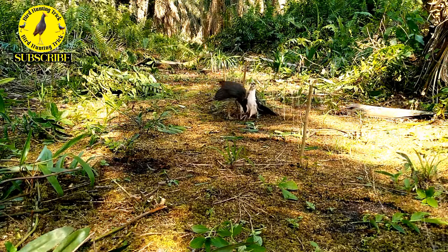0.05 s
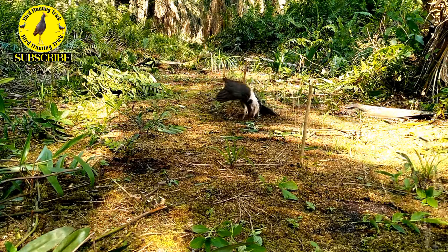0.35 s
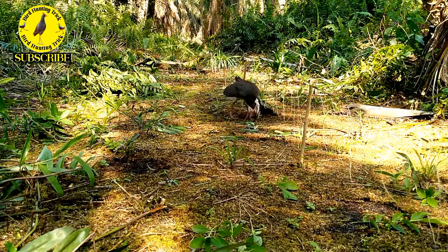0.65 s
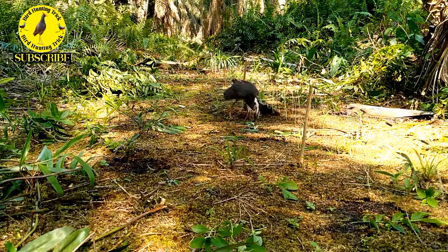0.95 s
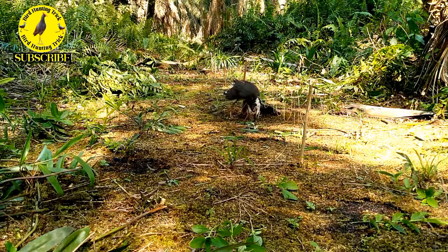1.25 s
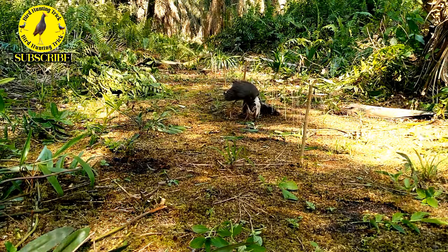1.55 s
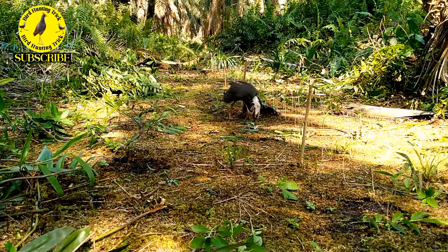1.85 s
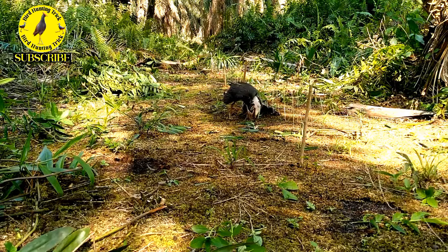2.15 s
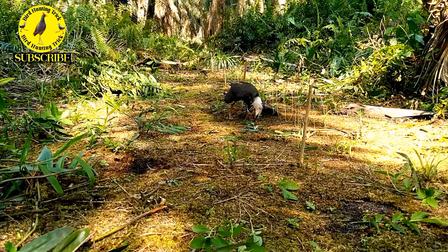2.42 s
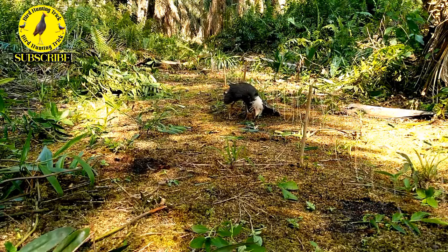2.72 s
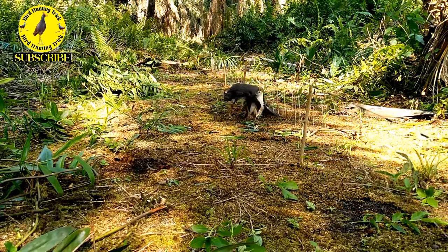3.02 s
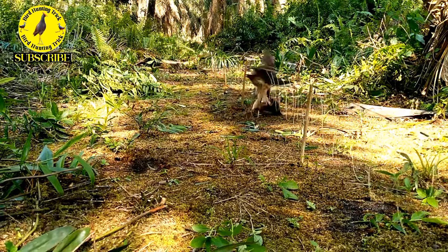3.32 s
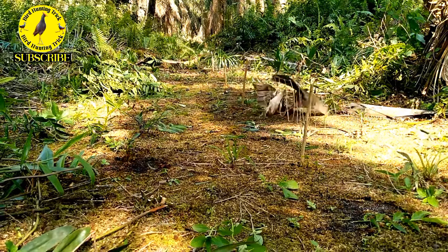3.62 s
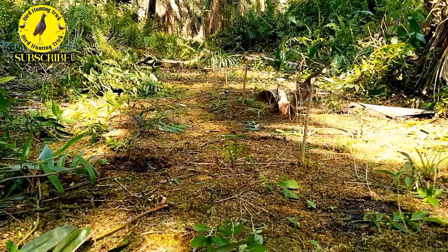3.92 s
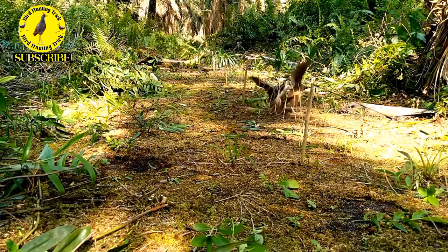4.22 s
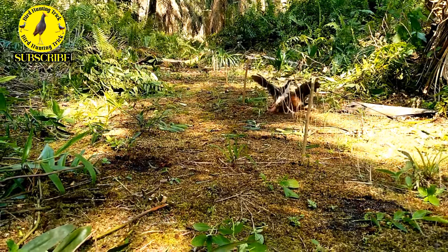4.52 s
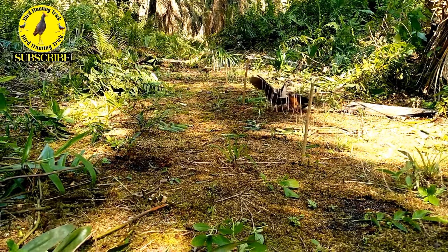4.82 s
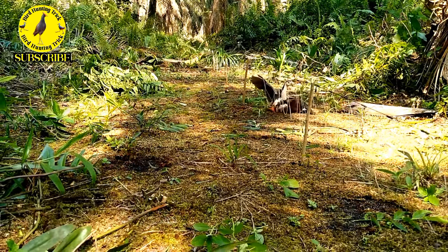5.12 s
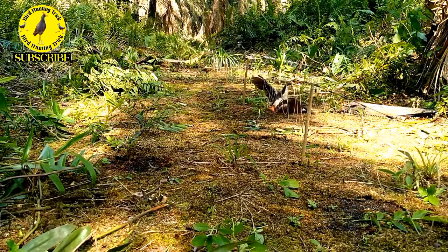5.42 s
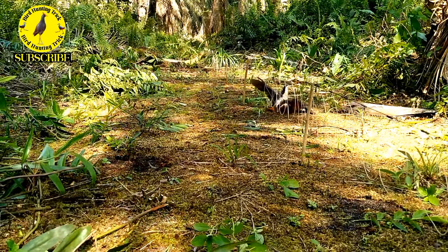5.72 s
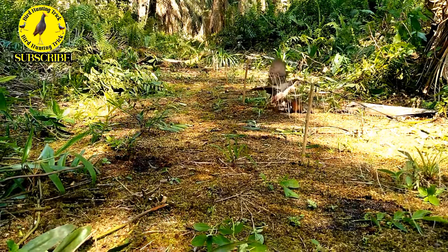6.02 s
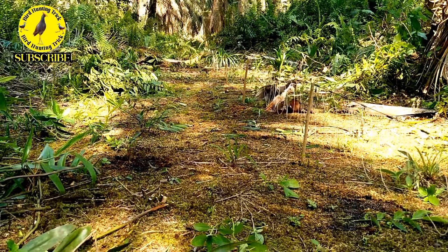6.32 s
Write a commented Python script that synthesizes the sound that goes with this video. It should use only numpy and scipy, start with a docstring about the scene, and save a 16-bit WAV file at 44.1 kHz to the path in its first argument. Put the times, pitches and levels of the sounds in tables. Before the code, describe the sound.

In a still, wooded marsh, insects hold a high drone while a bird fairly near the microphone calls in an even beat of short, raspy, rising notes. Another bird gives quieter, hoarse answers from deeper among the trees. Faint clucking and scratchy chatter grow rougher midway and fade as the main calls carry on. Occasional distant whistles and dull, soft bumps sit underneath, and the calls have a brief echo.

```python
"""A watercock repeats one short note, 2.5 times a second, in a wooded marsh: its syrinx starts low
and raspy, then breaks upward into a reedy tone that the windpipe colours. A second bird answers
farther off; faint rough clucks and scratchy chatter build up and die away. Insects drone high
above still air, with thin distant whistles and soft low thumps. The trees return a short echo."""
import sys
import numpy as np
from scipy import signal
from scipy.fft import rfft, irfft
from scipy.io import wavfile
from scipy.ndimage import uniform_filter1d

SR = 44100
rng = np.random.default_rng(int(sys.argv[2]) if len(sys.argv) > 2 else 0)


def digitize_waveform(pressure):
    """Quantize a signal to 16-bit integers and store it at the path in sys.argv[1].

    Rows of a 2-D input are taken as channels; values are limited to [-1, 1].
    """
    field = np.atleast_2d(pressure).T
    bounded = np.clip(field, -1, 1)
    quanta = np.round(bounded * 32767).astype(np.int16)
    wavfile.write(sys.argv[1], SR, quanta)


N = 280035
TIME_S = np.arange(N) / SR

# noise spectra: f/Hz, relative level/dB
AIR_SPECTRUM = [(20, -30), (45, -7), (75, 4.5), (140, -1), (220, -13), (450, -17.5), (800, -17.5),
                (1500, -22.5), (4000, -26), (4700, -29.5), (5100, -28.5), (7000, -32), (12000, -32),
                (15000, -41)]
INSECT_SPECTRUM = [(6500, -50), (7050, -28), (7550, -8), (7900, -9.5), (8350, -13.5), (8800, -6), (9150, 1),
                   (9500, -3.5), (10000, -15), (10400, -27), (10900, -26.5), (11700, -48), (13000, -66.5)]
CHATTER_SPECTRUM = [(400, -18.5), (1200, 2), (1700, -8.5), (2200, -4.5), (2550, 4.5), (2850, -6),
                    (3200, 3.5), (4100, -8.5), (4800, -5.5), (5600, -20.5), (7500, -27.5)]
CLUCK_SPECTRUM = [(200, -9), (420, 13.5), (800, -3), (1400, 3), (2400, -1.5), (3500, -18.5), (5200, -23.5),
                  (7000, -43.5)]
# far cricket trills: f/Hz, width/Hz, level/dB
CRICKET_BANDS = [(4726, 680, -83.5), (4600, 330, -82.5)]
# far bird's calls: t/s, level/dB
ANSWERS = [(-.088, -37.5), (.512, -36.5), (1.064, -40), (1.645, -36), (2.2, -36), (2.808, -37.5),
           (3.414, -38), (3.999, -38), (4.611, -37), (5.347, -39), (6.1, -35.5)]
# their reedy overtones: multiple, level/dB
ANSWER_OVERTONES = [(2, -35), (3, -35.5), (4, -26), (5, -32)]
# chatter bouts: full at t/s, hold/s, level/dB, build-up/(dB/s)
CHATTER_BOUTS = [(.1, 0.07, -65, 37), (1.669, .06, -66.5, 70), (2.9, 1.4, -61, 7.5)]
# near bird's runs, each restarting just ahead of the beat: t/s
RUN_STARTS_S = [.139, 2.5081, 6.0663]
# near bird's overtones: multiple, level/dB
EVEN_OVERTONES = [(2, -24.5), (4, -46.5), (6, -47.5), (8, -42.5)]  # throughout
LOW_OVERTONES = [(1.5, -26), (2, -37.5), (2.5, -27), (3, -39), (7, -47), (7.5, -42)]  # period-doubled opening
REED_OVERTONES = [(3, -13.5), (5, -41), (7, -33), (9, -31)]  # after the break
# windpipe response on the overtones: f/Hz, gain/dB
WINDPIPE_GAIN = [(1600, 2), (1880, -7), (2130, -7.5), (2280, -2), (2950, 0), (3450, 0), (3900, 11),
                 (4250, -3.5), (4750, -4), (5100, 9), (5400, 1), (5750, 3.5), (6500, -7.5), (7500, 2.5),
                 (8600, -3.5), (10000, 3)]
# broad low hiss under each note (first row), then bands of rasp: f/Hz, width/Hz, level/dB
NOTE_NOISE_BANDS = [(567, 800, -55), (1079, 190, -43), (1420, 670, -55.5), (2240, 160, -67.5),
                    (5700, 200, -64.5)]
# distant birds: t/s, length/s, start f/Hz, end f/Hz, level/dB
WHISTLES = [(0.338, 0.16, 2660, 2410, -63.5), (0.351, 0.089, 1263, 1450, -59.5),
            (2.39, 0.1, 2500, 2530, -66), (2.449, 0.088, 1286, 1400, -60), (3.84, 0.095, 2430, 2590, -57.5),
            (4.805, 0.062, 2025, 1930, -64.5)]
# low thumps: t/s, level/dB, f/Hz
THUMPS = [(0.394, -47, 70.5), (0.74, -48, 86), (0.966, -44, 68), (3.588, -44.5, 68.7), (3.9, -49, 79.4),
          (3.966, -39.5, 63.5), (4.31, -46, 60)]
# rising clucks: t/s, level/dB
CLUCKS = [(1.193, -58.5), (1.468, -59), (1.61, -55.5), (1.841, -54.5), (1.985, -58.5), (2.394, -55.5),
          (2.653, -61.5), (2.738, -56.5), (3.088, -56), (3.2, -58), (3.445, -50), (3.562, -49.5),
          (3.66, -54.5), (3.794, -53.5), (3.861, -55), (4.002, -50.5), (4.236, -52.5), (4.377, -50.5)]
# nearest trunks: delay/s, gain/dB
TRUNK_ECHOES = [(0.02, -25), (0.031, -35), (.0475, -30)]
# scatter from the wood: f/Hz, gain/dB
TAIL_GAIN = [(500, -28), (800, -46), (1150, -38), (2200, -22.5), (2900, -21), (3350, -16.5), (4200, -15),
             (5200, -14), (5720, -8), (6200, -15), (9000, -18.5)]
# its decay: f/Hz, T60/s
TAIL_T60 = [(500, 0.31), (1100, 0.64), (3300, 0.26), (6000, 0.41), (10000, .25)]


def amp(db):
    """Decibels to gain."""
    return 10 ** (np.asarray(db) / 20)


def unit_rms(x):
    """Scale to rms 1."""
    return x / np.sqrt(np.mean(x ** 2) + 1e-20)


def lookup(points, hz):
    """Interpolate on a log-frequency axis."""
    f, value = np.transpose(points)
    return np.interp(np.log(hz + 1), np.log(f + 1), value)


def add(mix, at_s, sound):
    """Mix a sound in at at_s."""
    start = round(at_s * SR)
    sound = sound[max(-start, 0):]
    part = mix[max(start, 0):][:len(sound)]
    part += sound[:len(part)]


def step(t, at_s, width_s):
    """Smooth step, 0 to 1."""
    return .5 + .5 * np.tanh((t - at_s) / (2 * width_s))


def bump(t, at_s, width_s):
    """Bell of height 1."""
    return np.exp(-((t - at_s) / width_s) ** 2)


def held(t, attack_s, release_s):
    """Rounded attack, hold, release."""
    ramp = np.minimum(t / attack_s, (t[-1] - t) / release_s)
    return np.sin(np.pi / 2 * np.clip(ramp, 0, 1)) ** 2


def wander(size, hz):
    """Smooth random drift, rms about 1, rolled off above hz."""
    span = max(size, SR // 4)
    lowpass = np.exp(-(np.fft.rfftfreq(span, 1 / SR) / hz) ** 2)
    return unit_rms(irfft(rfft(rng.standard_normal(span)) * lowpass, span))[:size]


def noise(spectrum, size):
    """Shaped noise, rms about 1."""
    span = max(size, SR // 4)
    gain = amp(lookup(spectrum, np.fft.rfftfreq(span, 1 / SR)))
    return unit_rms(irfft(rfft(rng.standard_normal(span)) * gain, span))[:size]


def patchy(spectrum, depth_db, patch_hz, patch_s):
    """Noise of rms 1; its level drifts in time-frequency patches."""
    hz, t, bins = signal.stft(rng.standard_normal(N), SR, nperseg=1024, noverlap=768)
    field = uniform_filter1d(rng.standard_normal(bins.shape), max(round(patch_hz / hz[1]), 1), 0)
    field = unit_rms(uniform_filter1d(field, max(round(patch_s / t[1]), 1), 1))
    bins *= amp(lookup(spectrum, hz)[:, None] + depth_db * field)
    return unit_rms(signal.istft(bins, SR, nperseg=1024, noverlap=768)[1][:N])


def bandpass(x, hz, width_hz):
    """Two-pole band-pass applied twice, scaled to rms 1."""
    b, a = signal.iirpeak(hz, hz / width_hz, SR)
    return unit_rms(signal.lfilter(b, a, signal.lfilter(b, a, x)))


def still_air(level_db=-61):
    """Faint, bass-heavy hush of the marsh."""
    return amp(level_db) * patchy(AIR_SPECTRUM, depth_db=3.9, patch_hz=200, patch_s=.034)


def insects(drone_db=-50, throb_db=1, trill_db=3):
    """Many insects merge into one high drone; cricket trills come and go below it."""
    gain = amp(drone_db + throb_db * wander(N, 20))
    drone = gain * patchy(INSECT_SPECTRUM, depth_db=1, patch_hz=260, patch_s=.07)
    trills = sum(amp(db + trill_db * wander(N, 5)) * bandpass(rng.standard_normal(N), hz, width_hz)
                 for hz, width_hz, db in CRICKET_BANDS)
    return drone + trills


def far_bird(low_hz=598.8, top_hz=1119, catch_hz=98, flick_hz=123,
             flutter=.024, shimmer_db=3.5, hoarse_db=-12, half_pitch_db=-4.5):
    """Hoarse answers: soft start, rise to a reedy hold, brief catch, upward flick."""
    out, t = np.zeros(N), np.arange(0, .1077, 1 / SR)
    rise = step(t, .03, .006)
    doubling = bump(t, .054, .011)  # period doubles: the tone dips, a half-pitch line enters
    catch = bump(t, .071, .0036)
    hz = low_hz + (top_hz - low_hz) * rise - catch_hz * catch + flick_hz * step(t, .091, .0022)
    effort_db = -12.5 * (1 - rise) - 10 * catch - 6 * doubling
    effort = held(t, attack_s=.006, release_s=.014) * amp(effort_db)
    reedy = np.clip((hz - 1020) / 60, 0, 1) * np.clip((1200 - hz) / 50, 0, 1)
    for at_s, db in ANSWERS:
        phase = 2 * np.pi * np.cumsum(hz * (1 + flutter * wander(len(t), 110))) / SR
        tone = np.sin(phase) + amp(half_pitch_db) * doubling * np.sin(phase / 2)
        tone += reedy * sum(amp(line_db) * np.sin(k * phase) for k, line_db in ANSWER_OVERTONES)
        tone += amp(hoarse_db) * wander(len(t), 280) * np.cos(phase)
        add(out, at_s, effort * amp(db + shimmer_db * wander(len(t), 120)) * tone)
    return out


def chatter(fall_db_per_s=47, spurt_db=2.2):
    """Faint scratchy clamour: swells in bouts, comes in quick spurts."""
    power = np.zeros(N)
    for full_s, hold_s, db, build_db_per_s in CHATTER_BOUTS:
        before_s = np.maximum(full_s - TIME_S, 0)
        after_s = np.maximum(TIME_S - full_s - hold_s, 0)
        power += amp(db - build_db_per_s * before_s - fall_db_per_s * after_s) ** 2
    spurts = amp(spurt_db * wander(N, 22))
    return np.sqrt(power) * spurts * patchy(CHATTER_SPECTRUM, depth_db=3.8, patch_hz=220, patch_s=.07)


def watercock_note(low_hz=782.4, mid_hz=954.1, top_hz=1143, break_hz=880, sag_hz_per_s=4200,
                   tone_db=-20.5, grow_db=2.5, swell_db=5.5, bright_db=3, shimmer_db=1.36,
                   flutter=.018, flutter_hz=380, noise_fall_db_per_s=35.5,
                   pop_db=-27, pop_hz=1460, pop_s=.0042, body_hz=480):
    """The fluttering syrinx opens low and raspy, breaks up in two steps, turns reedy, then sags."""
    t = np.arange(0, .096, 1 / SR)
    first_step, second_step = step(t, .0432, .0013), step(t, .054, .0024)
    hz = low_hz + (mid_hz - low_hz) * first_step + (top_hz - mid_hz) * second_step
    hz -= sag_hz_per_s * np.maximum(t - .0748, 0)
    phase = 2 * np.pi * np.cumsum(hz) / SR + flutter * hz / flutter_hz * wander(len(t), flutter_hz)
    effort = held(t, attack_s=.003, release_s=.017) * amp(grow_db * step(t, .022, .0028))
    swell = amp(swell_db * bump(t, .0492, .0044))
    reedy = amp(-26) + amp(2.5) * step(t, .04755, .0002) * bump(t, .055, .014)
    low = np.clip((break_hz - hz) / 60 + .5, 0, 1)

    def overtones(rows):
        """Flickering overtones, lifted or swallowed by the windpipe as they sweep."""
        lines = np.zeros(len(t))
        for k, db in rows:
            flicker_db = shimmer_db * (k - 5.5) * wander(len(t), 87)
            lines += amp(db + lookup(WINDPIPE_GAIN, k * hz) + flicker_db) * np.sin(k * phase)
        return lines

    tone = swell * np.sin(phase) + amp(bright_db * second_step) * overtones(EVEN_OVERTONES)
    tone += reedy * overtones(REED_OVERTONES) + low * overtones(LOW_OVERTONES)
    pulsed_noise = rng.standard_normal(len(t)) * (1 + np.cos(phase))
    hiss_and_rasp = sum(amp(db) * bandpass(pulsed_noise, band_hz, width_hz)
                        for band_hz, width_hz, db in NOTE_NOISE_BANDS)
    # the sudden opening knocks the throat
    age = t / pop_s
    pop = amp(pop_db) * age ** 2 * np.exp(1 - age ** 2) * np.sin(2 * np.pi * pop_hz * t)
    # a small body radiates no bass
    body = signal.butter(3, body_hz, "highpass", fs=SR, output="sos")
    voice = signal.sosfilt(body, amp(tone_db) * effort * tone + pop)
    return voice + effort * swell * amp(-.5 - noise_fall_db_per_s * t) * hiss_and_rasp


def watercock(beat_s=.39637):
    """Near bird: the same note on every beat."""
    out, note = np.zeros(N), watercock_note()
    for start_s, end_s in zip(RUN_STARTS_S, RUN_STARTS_S[1:] + [N / SR]):
        for at_s in np.arange(start_s, end_s - beat_s / 2, beat_s):
            add(out, at_s, note)
    return out


def whistles(waver=.0097):
    """Soft wavering glides from birds deep in the wood."""
    out = np.zeros(N)
    for at_s, length_s, start_hz, end_hz, db in WHISTLES:
        size = round(length_s * SR)
        hz = np.linspace(start_hz, end_hz, size) * (1 + waver * wander(size, 120))
        add(out, at_s, amp(db) * np.hanning(size) * np.sin(2 * np.pi * np.cumsum(hz) / SR))
    return out


def thumps(rise_s=.0071):
    """Dull bumps of two or three cycles."""
    out, t = np.zeros(N), np.arange(SR // 6) / SR
    envelope = t / rise_s * np.exp(1 - t / rise_s)
    for at_s, db, hz in THUMPS:
        add(out, at_s, -amp(db) * envelope * np.sin(2 * np.pi * hz * t))
    return out


def clucks(start_hz=470, rise_hz=500, length_s=.032, third_db=-13,
           calm_db=-7, excited_db=-3, excited_at_s=2.2):
    """Quick upward sweeps in rasp, rougher after excited_at_s."""
    out = np.zeros(N)
    progress = np.arange(0, 1, 1 / (length_s * SR))
    swell = np.minimum(progress / .1, 1) * np.sqrt(1 - progress)
    for at_s, db in CLUCKS:
        hz = (start_hz + rise_hz * progress) * (1 + .025 * wander(len(progress), 200))
        phase = 2 * np.pi * np.cumsum(hz) / SR
        tone = np.sin(phase) + amp(third_db) * np.sin(3 * phase)
        rasp_db = calm_db + (excited_db - calm_db) * step(at_s, excited_at_s, .1)
        rasp = amp(rasp_db) * np.sin(np.pi * progress) * noise(CLUCK_SPECTRUM, len(progress))
        add(out, at_s, amp(db) * (swell * tone + rasp))
    return out


def tree_echo(x, build_s=.045, stir_hz=.3):
    """Near trunks reflect singly; the wood behind scatters a tail."""
    out, t = np.zeros(N), np.arange(SR // 2) / SR
    onset = np.interp(t, [0, .03, build_s], [.35, .6, 1])
    # stirring leaves shift the scatter: three tails crossfade
    for turn in np.arange(3) / 3:
        hz, age_s, bins = signal.stft(rng.standard_normal(len(t)), SR, nperseg=256)
        t60_s = lookup(TAIL_T60, hz)[:, None]
        decay_db = 60 * np.maximum(age_s - build_s, 0) / t60_s
        energy_norm = np.sqrt(2 * np.log(1000) / (t60_s * SR))
        bins *= amp(lookup(TAIL_GAIN, hz)[:, None] - decay_db) * energy_norm
        tail = signal.istft(bins, SR, nperseg=256)[1][:len(t)] * onset
        share = np.sqrt(2 / 3) * np.cos(2 * np.pi * (stir_hz * TIME_S + turn))
        out += signal.fftconvolve(x * share, tail)[:N]
    for delay_s, db in TRUNK_ECHOES:
        add(out, delay_s, amp(db) * x)
    return out


def scene(far_wet_db=9):
    """Birds among trees, over insects and still air; mono."""
    near = watercock()
    far = far_bird() + clucks() + whistles()
    air = still_air()
    echo = tree_echo(near + amp(far_wet_db) * far)
    return (near + far + echo + chatter() + thumps() + insects() + air)[None]


def record(dry, bass_hz=42, edge_hz=15000):
    """Microphone bass roll-off, then a steep band limit."""
    highpass = signal.butter(2, bass_hz, "highpass", fs=SR, output="sos")
    lowpass = signal.firwin(511, edge_hz, window=("kaiser", 9), fs=SR)
    return signal.oaconvolve(signal.sosfilt(highpass, dry), lowpass[None], "same")


dry = scene()
out = record(dry)
digitize_waveform(out)
```